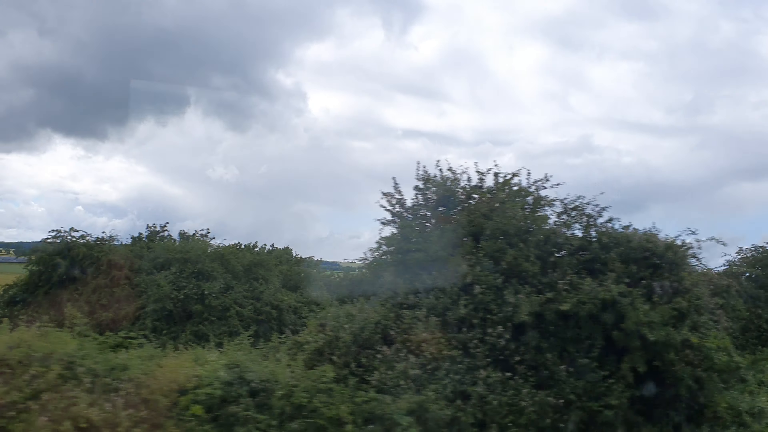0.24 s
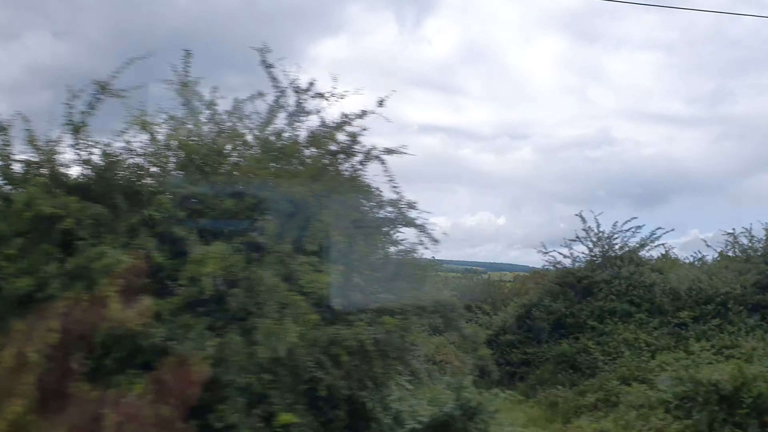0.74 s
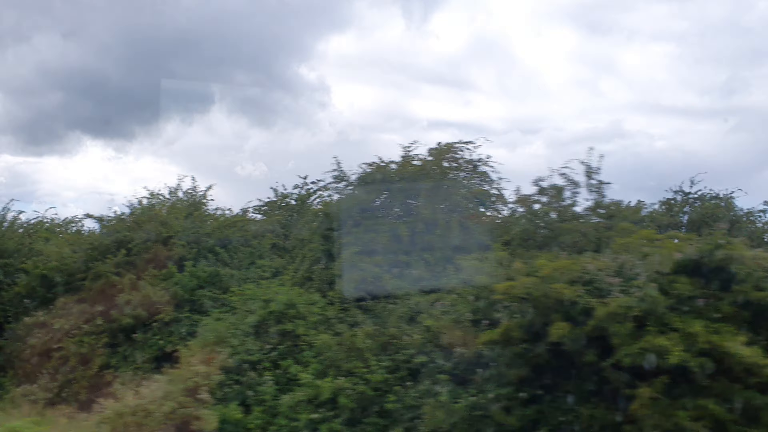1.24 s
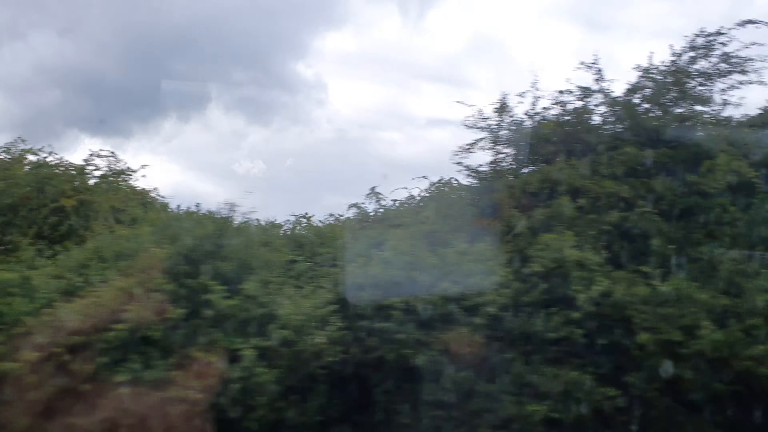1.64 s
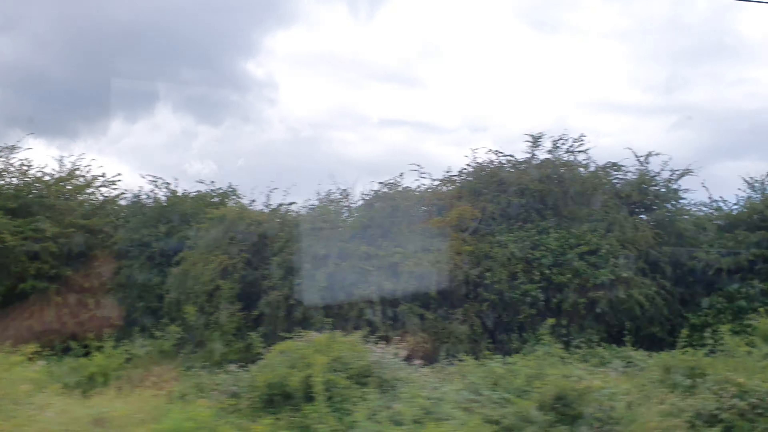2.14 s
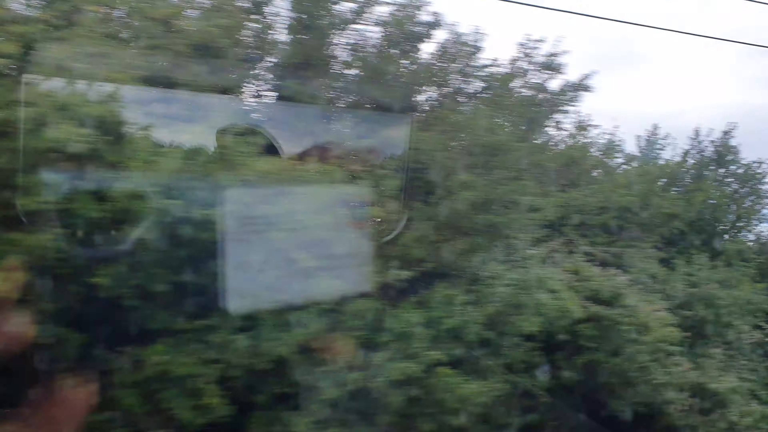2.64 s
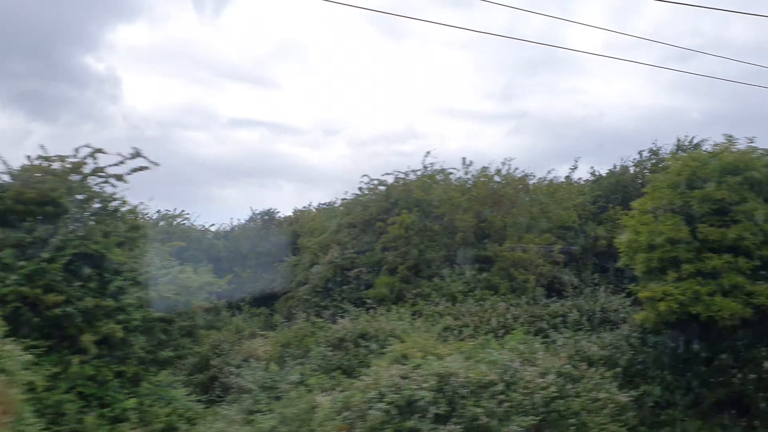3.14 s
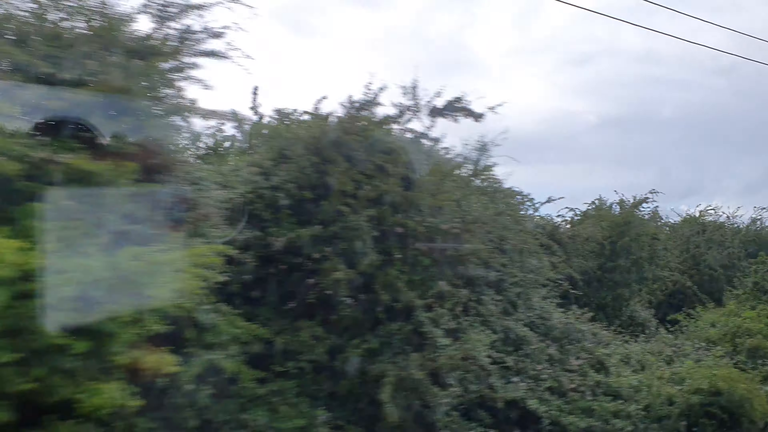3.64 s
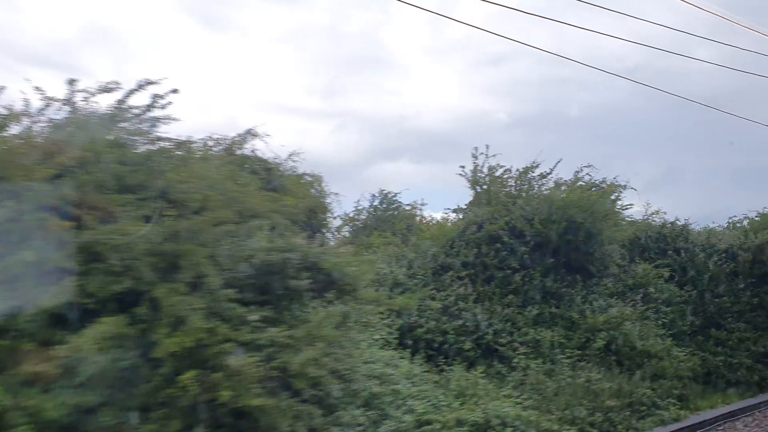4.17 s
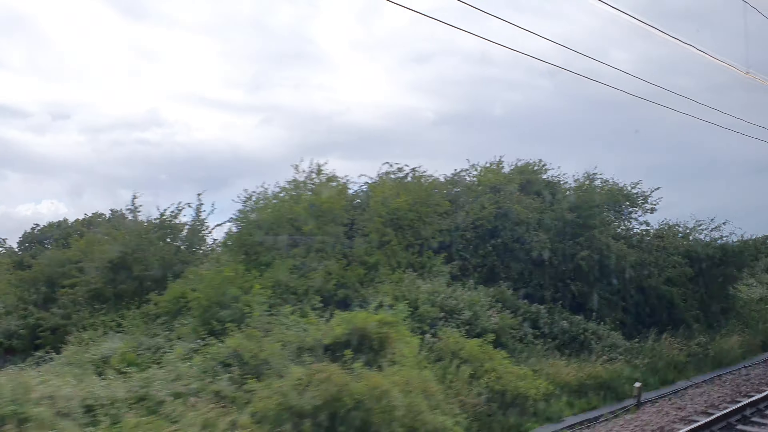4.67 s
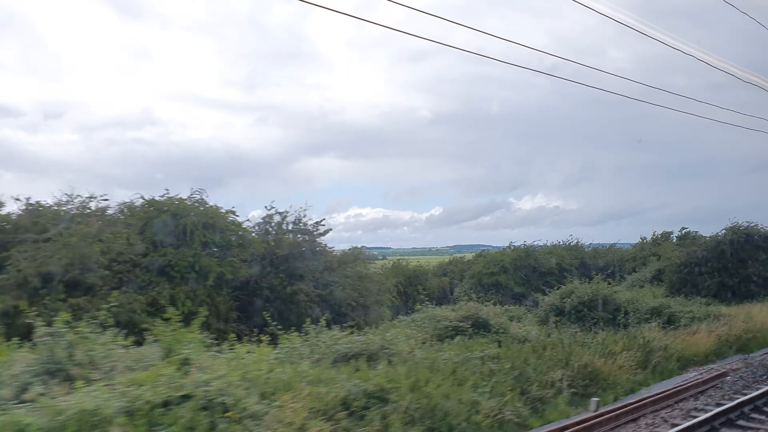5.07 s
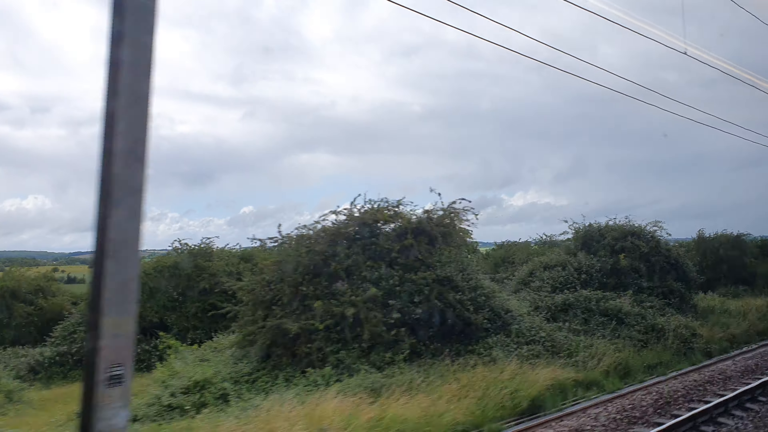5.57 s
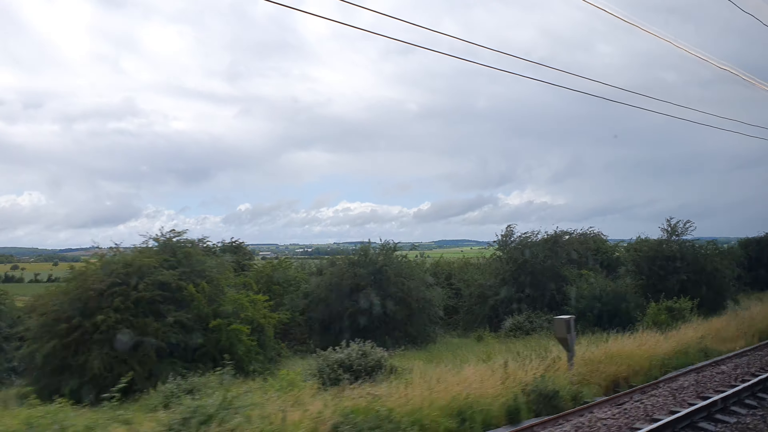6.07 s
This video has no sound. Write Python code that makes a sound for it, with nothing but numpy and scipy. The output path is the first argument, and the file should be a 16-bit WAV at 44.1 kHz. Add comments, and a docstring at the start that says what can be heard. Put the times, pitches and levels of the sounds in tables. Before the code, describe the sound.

Heard from within a moving train carriage, wheels rumble steadily through the floor and the body drones on one low note. A faint electric whine and a thin ringing from the wheels sit above it. Close by come a few light panel ticks and a short crackly rustle. The rumble surges once about halfway, and soon after the whine changes to a higher pitch as the train keeps its pace.

```python
"""Wheels of an electric passenger train at speed, heard from inside: they rumble through the floor
and roar on the rail, louder where the track is rough. Turning machinery sets the car body droning
on a low note; the drive whines faintly and changes its notes after four seconds. Loose trim ticks
now and then, and something crisp rustles briefly in the carriage."""
import sys
import numpy as np
from scipy import signal
from scipy.fft import rfft, irfft, next_fast_len
from scipy.io import wavfile
from scipy.ndimage import uniform_filter1d, minimum_filter1d, map_coordinates

SR = 44100
rng = np.random.default_rng(int(sys.argv[2]) if len(sys.argv) > 2 else 0)


def bounce(signal):
    """Save signal as a 16-bit WAV file at the path given by the first command-line argument."""
    frames = np.transpose(np.atleast_2d(signal))
    limited = np.clip(frames, -1, 1)
    pcm = np.round(limited * 32767).astype(np.int16)
    wavfile.write(sys.argv[1], SR, pcm)


N = 278271

# crisp noise of ticks and rustle: f/Hz, relative density/dB
CRISP_SPECTRUM = [(1800, -12), (3000, 7.5), (3500, -0.5), (4500, 0), (6200, 2.5), (9000, -3.5),
                  (12000, -1.5), (15700, -4)]


def amp(db):
    """Decibels to gain."""
    return 10 ** (np.asarray(db) / 20)


def unit(x):
    """x at rms 1."""
    return x / np.sqrt(np.mean(x ** 2) + 1e-20)


def clock():
    """Sample times in s."""
    return np.arange(N) / SR


def over_time(points):
    """(t/s, value) points, interpolated per sample."""
    return np.interp(clock(), *np.transpose(points))


def over_hz(points, hz):
    """(f/Hz, value) points, interpolated on a log axis."""
    knots_hz, values = np.transpose(points)
    return np.interp(np.log(hz + 1), np.log(knots_hz + 1), values)


def wobble(knots_per_s):
    """Smooth random curve."""
    return map_coordinates(rng.standard_normal(4096), [clock() * knots_per_s], mode="wrap")


def swell(at_s, half_s):
    """Gaussian rise and fall, peak 1."""
    return np.exp(-((clock() - at_s) / half_s) ** 2)


def filtered(x, response):
    """x through a complex frequency response."""
    size = next_fast_len(N + SR // 2)
    return irfft(rfft(x, size) * response(np.fft.rfftfreq(size, 1 / SR)), size)[..., :N]


def panned(x, left_db):
    """x with the left side louder by left_db."""
    return x * amp([[left_db / 2], [-left_db / 2]])


def diffuse(response):
    """Coloured noise of rms 1 filling the carriage: long waves reach both ears alike."""
    # f/Hz, left-right correlation
    coherence = [(20, 0.96), (140, 1), (250, 0.85), (400, .55), (600, .35), (1000, -0.12), (1900, 0.1),
                 (4000, 0), (12000, 0.034)]

    def mid_side(hz):
        angle = np.arccos(np.clip(over_hz(coherence, hz), -1, 1)) / 2
        return response(hz) * np.array([np.cos(angle), np.sin(angle)])
    mid, side = filtered(rng.standard_normal((2, N)), mid_side)
    return unit(np.array([mid + side, mid - side]))


def rush(spectrum):
    """Diffuse noise with an (f/Hz, level/dB) spectrum, falling steeply beyond its ends."""
    low_hz, high_hz = spectrum[0][0], spectrum[-1][0]
    skirts = lambda hz: (np.minimum(hz / low_hz, 1) * np.minimum(high_hz / (hz + 1), 1)) ** 6
    return diffuse(lambda hz: amp(over_hz(spectrum, hz)) * skirts(hz))


def noise_bands(bands):
    """Fuzzy tones of total rms 1 from (f/Hz, width/Hz, relative level/dB) rows."""
    power = lambda hz: sum(amp(db) ** 2 / width_hz / (1 + (2 * (hz - centre_hz) / width_hz) ** 2) ** 2
                           for centre_hz, width_hz, db in bands)
    return diffuse(lambda hz: np.sqrt(power(hz)))


def wavering(partials, drift_rad, flutter_db):
    """Tones of total rms 1 that drift in phase and flutter, differently at each ear."""
    tones = np.zeros((2, N))
    for hz, db in partials:
        phase = 2 * np.pi * (hz * clock() + rng.uniform())
        phase += drift_rad * hz / partials[0][0] * wobble(14)
        for ear in range(2):
            tones[ear] += amp(db + flutter_db * wobble(17)) * np.sin(phase + 1.1 * wobble(6))
    return unit(tones)


def rolling():
    """Rail roughness shakes floor and body; the higher rush comes in through the windows."""
    # spectra of floor, car body, wheels on rail, air along the car: f/Hz, relative density/dB
    floor_spectrum = [(11, -43.5), (18, -8), (59, -4), (97, -3), (112, -11), (150, -29.5), (250, -120)]
    body_spectrum = [(85, -32), (112, 1), (146, -2), (160, -7), (188, -14.5), (228, -10), (262, -14.5),
                     (305, -14.5), (345, -21.5), (385, -19), (435, -25.5), (620, -28.5), (800, -36),
                     (1300, -65.5)]
    rail_spectrum = [(400, -19.5), (750, 4.5), (1150, 4.5), (1450, 0.5), (1700, -2), (2150, -1),
                     (2450, -8.5), (3000, -29), (4500, -50)]
    air_spectrum = [(1700, -17), (2600, 1), (3100, -3), (3600, -4), (4100, -7.5), (5200, -13), (5700, -12),
                    (6400, -17), (7500, -18), (9000, -25), (12000, -24.5), (15700, -31.5)]
    # rail roughness: t/s, relative level/dB
    roughness = [(0, 0.1), (0.45, 0.2), (1.1, -0.6), (1.8, 2.5), (2.9, 1.1), (3.3, 0.14), (4.25, -0.9),
                 (4.75, 1.2), (6.3, 0.77)]
    # f/Hz, left minus right/dB
    balance = [(30, 1.9), (120, -1.2), (280, 1.2), (500, 3), (1000, -2.5), (2000, 2.5), (4000, 0.5),
               (12000, 2.1)]
    track_db = over_time(roughness)
    patch_db = 8.2 * swell(at_s=3.296, half_s=0.15)  # one rough patch of track
    rumble = amp(-19.5 + 1.3 * track_db + 0.66 * patch_db + 1.1 * wobble(9.5)) * rush(floor_spectrum)
    body = amp(-20 + 0.9 * track_db + 0.65 * patch_db + 0.4 * wobble(9.5)) * rush(body_spectrum)
    rail = amp(-44 + 1.2 * track_db + 0.1 * patch_db + 0.77 * wobble(11)) * rush(rail_spectrum)
    air = amp(-57.5 + 0.73 * track_db + 0.5 * wobble(7.9)) * rush(air_spectrum)
    ear_gains = lambda hz: amp(over_hz(balance, hz) * np.array([[0.5], [-0.5]]))
    return filtered(rumble + body + rail + air, ear_gains)


def drone(note_hz=127.15):
    """Turning machinery gives the car body a steady low hum, slightly uneven in level."""
    # main note: t/s, relative level/dB
    hum_level = [(0, -16), (0.55, -12.5), (1.1, -18.5), (2.3, -14.5), (3.2, -13.5), (4.5, -15.5),
                 (5.8, -13.5), (6.3, -15.5)]
    # weaker tones: f/Hz, level/dB
    hums = [(41.7, -33), (60.9, -27), (74.3, -29), (300, -45), (2869, -75.5)]
    t = clock()
    gain = amp(over_time(hum_level) - 4 + 1.5 * wobble(11))
    hum = gain * np.sin(2 * np.pi * note_hz * t + 0.11 * wobble(8.7))
    for hz, db in hums:
        gain = amp(db + 2.5 * wobble(1.3))
        hum += gain * np.sin(2 * np.pi * hz * t + 0.14 * wobble(1.2) + rng.uniform(0, 2 * np.pi))
    return panned(np.sqrt(2) * hum, left_db=0.1)


def drive_whine(changed):
    """Low notes give way to high ones as changed goes from 0 to 1, each set in a rough whirr."""
    # partials: f/Hz, relative level/dB
    low_notes = [(657, -3.5), (671, 1.5), (1347, -11.5), (2024, -18)]
    high_notes = [(795, -15), (888, 6), (980, -6.5), (1771, -11.5), (1852, -17.5), (3543, -18), (7074, -38)]
    # t/s, relative level/dB
    strength = [(0.0, -41), (0.3, -46.5), (0.55, -40), (1.05, -46.5), (1.8, -39.5), (2.45, -40.5),
                (2.7, -46), (3.9, -43.5), (4.5, -43), (5.3, -48.5), (6.0, -44.5), (6.3, -44.5)]
    whine_db = over_time(strength)
    low = amp(whine_db - 1.5) * wavering(low_notes, drift_rad=0.93, flutter_db=4)
    low += amp(-49.5) * noise_bands([(710, 130, -1), (2340, 510, -7.5)])
    high = amp(whine_db - 3.5) * wavering(high_notes, drift_rad=0.96, flutter_db=4)
    high += amp(-48.5) * noise_bands([(907, 95, -0.5), (1800, 190, -5.5)])
    return panned((1 - changed) * low, left_db=4) + changed * high


def wheel_singing(changed):
    """The wheels sing faintly in slow swells; one note gives way to a lower one as changed rises."""
    # t/s, relative level/dB
    strength = [(0, -53.0), (1.7, -51), (3.0, -48), (4.2, -50), (5.0, -49), (5.5, -48.5), (6.3, -51.5)]
    early = (1 - changed) * amp(-2.5) * noise_bands([(2027, 28, 0)])
    late = changed * amp(-8) * wavering([(1852, 0)], drift_rad=0.24, flutter_db=2)
    steady = noise_bands([(1923, 100, 0), (1835, 12, -7.5)])
    return panned(amp(over_time(strength) - 2.5) * (steady + early + late), left_db=3)


def trim_ticks(chatter_t60_s=0.18, snap_t60_s=0.026):
    """A loose panel snaps or scuffs, chatters for an instant and rings in a few short resonances."""
    # t/s, relative level/dB, brightness/dB, attack/s
    ticks = [(0.9781, -37, -15, 0.0011), (1.991, -39, -16.5, 0.0012), (2.6944, -46, -25.5, 0.0012),
             (3.2012, -49.5, -12.5, .002), (3.626, -54.5, -22, 0.0013), (4.902, -47.5, -16, 0.016),
             (5.608, -43, -21, .004), (6.085, -45.5, -18, 0.024)]
    # panel resonances: f/Hz, width/Hz, relative level/dB
    modes = [(2660, 480, 5), (3530, 550, 0), (4450, 540, -6), (6100, 500, -13)]
    force, bright = np.zeros(N), np.zeros(N)
    for at_s, db, bright_db, attack_s in ticks:
        age_s = np.maximum(clock() - at_s, 0)
        fade_db = 60 * np.maximum(age_s - attack_s, 0) / chatter_t60_s
        chatter = np.minimum(age_s / attack_s, 1) * amp(db - fade_db)
        snap = amp(-60 * age_s / snap_t60_s)
        force += chatter * (1 + 1.8 * snap)
        bright += chatter * amp(bright_db) * (1 + 1.5 * snap)

    def panel(hz):
        response = 0
        for k, (mode_hz, width_hz, db) in enumerate(modes):
            damping = 1j * hz * width_hz
            response += (-1) ** k * amp(db) * damping / (mode_hz ** 2 - hz ** 2 + damping)
        return response / (1 + (hz / 7000) ** 6)
    contacts = rng.standard_normal((2, N))
    ring = filtered(force * contacts, panel) / np.std(filtered(contacts, panel))
    return panned(amp(-5.5) * ring, left_db=3) + amp(-11.5) * bright * rush(CRISP_SPECTRUM)


def crackle(snaps_per_s=140, t60_s=0.012):
    """Stereo gain of rms 1: fine grain with tiny snaps scattered over it."""
    onsets = rng.uniform(size=N) < snaps_per_s / SR
    impulses = onsets * amp(2.5 + 2.5 * rng.standard_normal(N))
    snaps = signal.fftconvolve(impulses, amp(-60 * clock()[:SR // 20] / t60_s))[:N]
    grain = amp(2.2 * np.array([wobble(420), wobble(470)]))
    return unit((1 + snaps) * grain)


def rustle(attack_s=0.003, sag_db_per_s=67.5, t60_s=0.14):
    """Short strokes of something crisp: each starts at once, eases off and dies away, crackling."""
    # t/s, length/s, level/dB
    strokes = [(1.557, .05, -54), (1.637, .02, -46), (1.756, 0.083, -56), (1.827, 0.082, -45.5),
               (1.927, .025, -50.5), (2.459, 0.067, -62.5), (3.09, 0.089, -67), (3.192, 0.048, -60.5),
               (4.894, 0.095, -66.5)]
    stirring = amp(-80.5 + 2.5 * wobble(2.6)) + amp(-65.5) * swell(at_s=1.78, half_s=0.24)
    power = stirring ** 2
    for at_s, length_s, db in strokes:
        age_s = np.maximum(clock() - at_s, 0)
        fade_db = sag_db_per_s * age_s + 60 * np.maximum(age_s - length_s, 0) / t60_s
        power += (np.minimum(age_s / attack_s, 1) * amp(db - fade_db)) ** 2
    return panned(np.sqrt(power) * crackle() * rush(CRISP_SPECTRUM), left_db=-1)


def carriage_reverb(x):
    """Seats and walls give a short answer, shorter in the treble."""
    # f/Hz, T60/s
    decay = [(500, .3), (3000, 0.31), (12000, 0.086)]
    hz, t, noise = signal.stft(rng.standard_normal((2, SR // 2)), SR, nperseg=256)
    tail = signal.istft(noise * amp(-60 * t / over_hz(decay, hz)[:, None]), SR, nperseg=256)[1]
    return signal.fftconvolve(x, tail / np.linalg.norm(tail[0]), axes=1)[:, :N]


def scene(change_s=4.1):
    """The running train, with small sounds inside the carriage."""
    changed = 0.5 + 0.5 * np.tanh((clock() - change_s) / 0.15)
    near = trim_ticks() + rustle()
    running = rolling() + drone() + drive_whine(changed) + wheel_singing(changed)
    return running + near + amp(-4) * carriage_reverb(near)


def record(dry):
    """The level dips smoothly under the highest crests; the ends fade and the top treble is cut."""
    ceiling, smooth_s, fade_s, top_hz = 0.86, 0.012, 0.004, 15720
    window = int(smooth_s * SR)
    needed_gain = ceiling / np.maximum(np.abs(dry).max(axis=0), ceiling)
    limited = dry * uniform_filter1d(minimum_filter1d(needed_gain, 2 * window), window)
    t = clock()
    edge = np.clip(np.minimum(t, t[-1] - t) / fade_s, 0, 1)
    return filtered(limited * np.sin(edge * np.pi / 2) ** 2, lambda hz: hz < top_hz)


dry = scene()
out = record(dry)
bounce(out)
```